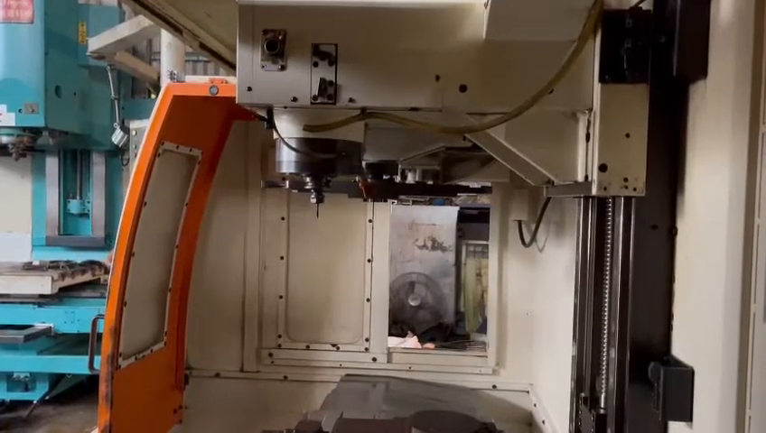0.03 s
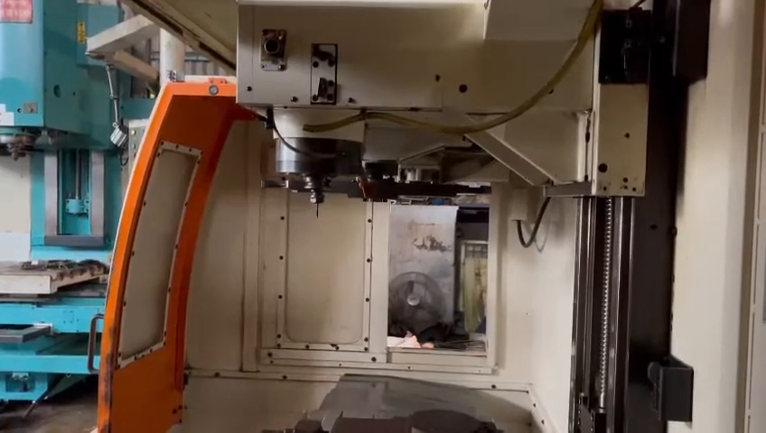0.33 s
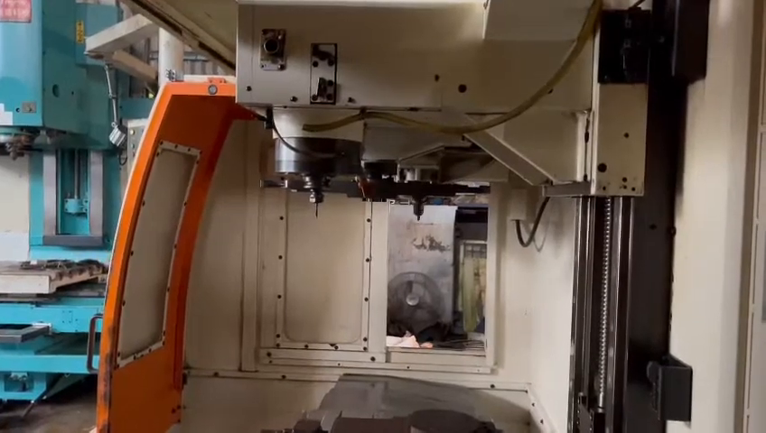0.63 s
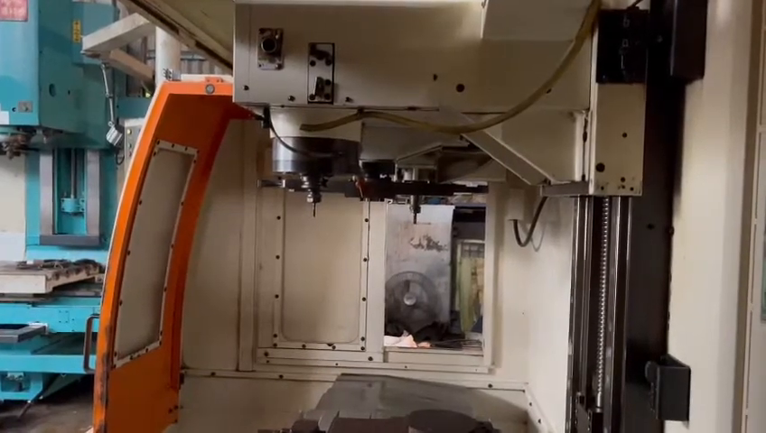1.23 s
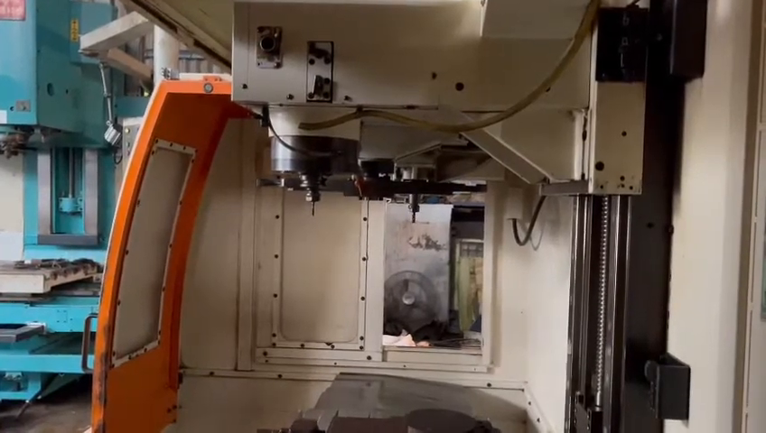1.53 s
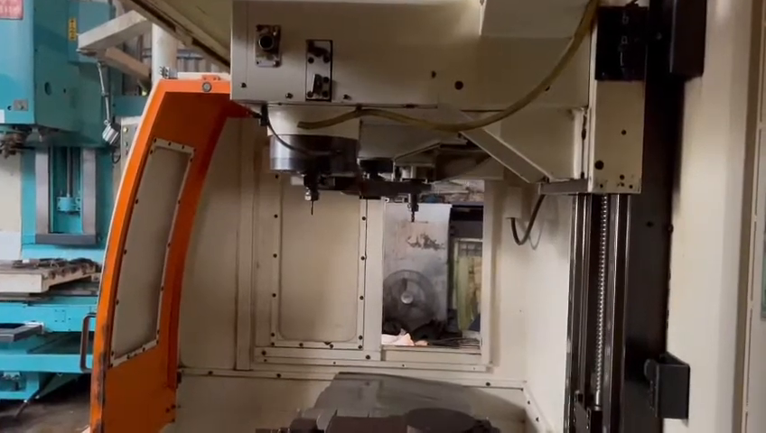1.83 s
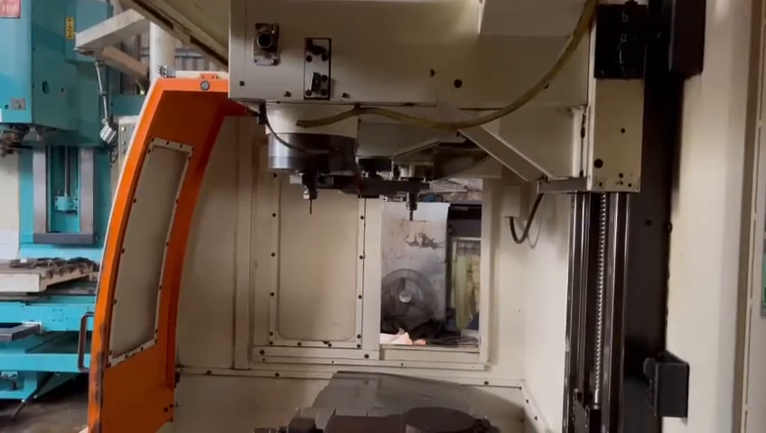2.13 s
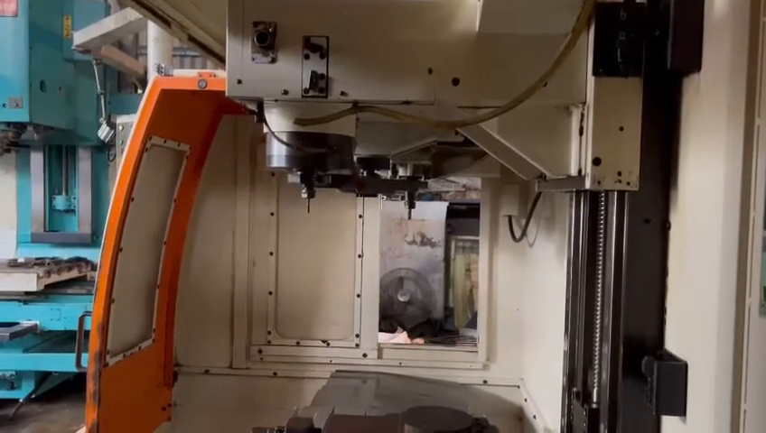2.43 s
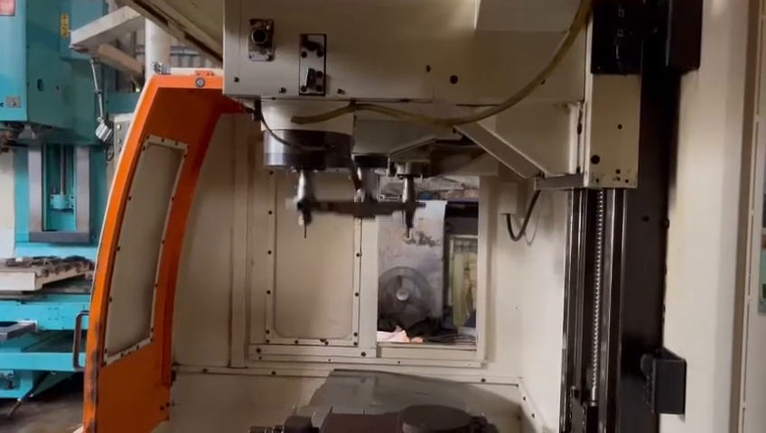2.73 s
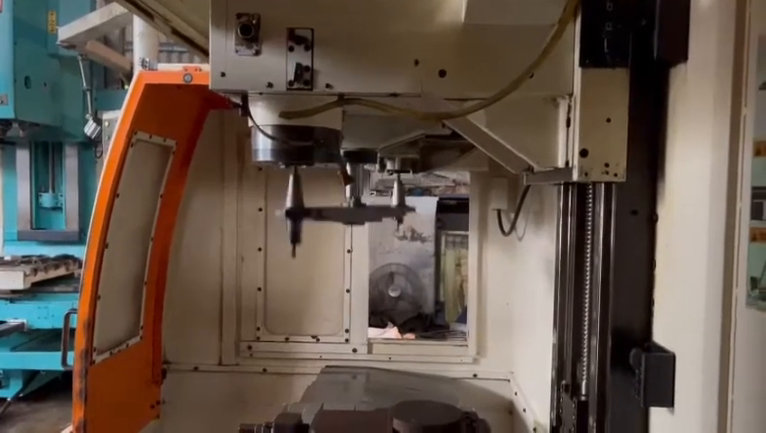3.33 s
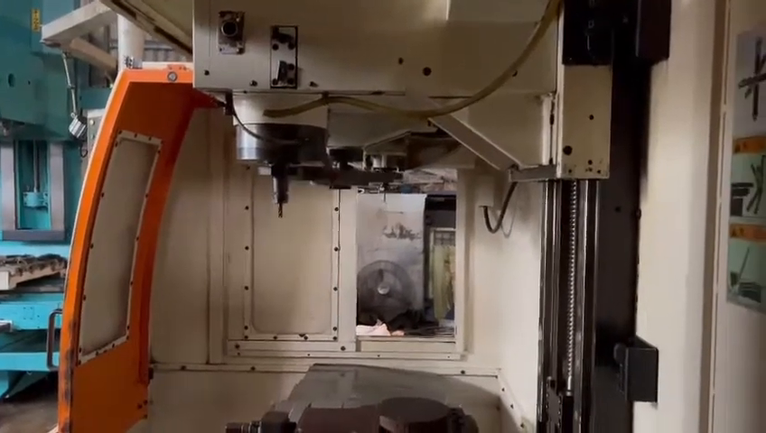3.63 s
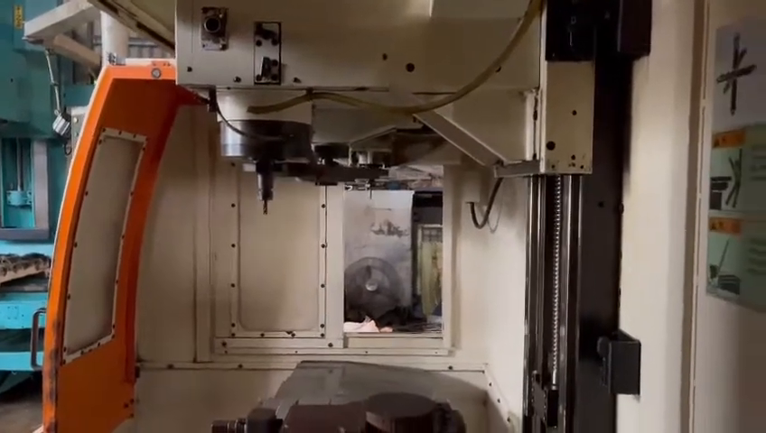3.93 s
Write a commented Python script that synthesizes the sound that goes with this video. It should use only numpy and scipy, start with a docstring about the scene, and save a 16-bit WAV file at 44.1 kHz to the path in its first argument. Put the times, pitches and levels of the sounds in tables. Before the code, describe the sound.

A machining centre changes its tool, heard close up over steady workshop hum. A low rumble fades by 0.4 seconds. A squeak at 1.2 leads to ringing metal knocks at 1.5 and 1.8. A thump and air blast follow at 1.9. From 2.5 a geared arm clanks, whines and chatters over hissing air. It knocks home around 3.5, and a second blast follows, echoing briefly off steel walls.

```python
"""A humming workshop, stereo microphone close by at the open door of a machining centre's steel enclosure.
The machine changes its tool. The head rumbles to a stop; the tool pot squeaks, swings down and lands
with ringing knocks. The drawbar releases with a thump and a blast of air through the spindle bore.
The geared arm whines and chatters as it pulls, swings and seats the tools over a hiss of purge air,
and the drawbar clamps with a second blast. Clatter and air echo between the steel walls."""
import sys
import numpy as np
from scipy import signal
from scipy.fft import rfft, irfft
from scipy.io import wavfile

SR = 44100
rng = np.random.default_rng(int(sys.argv[2]) if len(sys.argv) > 2 else 0)


def store_pcm(level_fs):
    """Save levels as 16-bit WAV."""
    pcm = np.round(np.clip(level_fs, -1, 1) * 32767).astype(np.int16)
    wavfile.write(sys.argv[1], SR, np.atleast_2d(pcm).T)


N = 176400
T = np.arange(N) / SR
HZ = np.maximum(np.arange(N // 2 + 1) * SR / N, 1)

# workshop and idling machine: freq_hz, density_db
SHOP_SPECTRUM = [(22, -70), (35, -72), (50, -57), (70, -62), (90, -59), (115, -62.5), (150, -56.5),
                 (200, -55), (290, -60), (400, -62), (750, -62.5), (950, -69), (1300, -69), (1800, -77),
                 (5700, -78.5), (6700, -70.5), (8400, -76), (9500, -71), (11500, -76)]
# pumps and fans: pitch_hz, level_db, wander_hz
HUM_TONES = [(196.7, -41, 5.89), (222.5, -50.5, 5), (121.3, -46.5, 2.53), (104.1, -49.5, 2.8),
             (72.2, -47, 3.9), (477.7, -49, 3.08), (1228, -45.5, 2.37)]
# head travelling up: freq_hz, density_db
TRAVEL_SPECTRUM = [(25, -74), (60, -43.5), (100, -52.5), (190, -47), (300, -53.5), (600, -75),
                   (1500, -82.5)]
# short notes of the pot, the slowing arm motor and the spindle bore:
# start_s, pitch_hz, level_db, rise_s, decay_s
BRIEF_TONES = [(1.215, 700, -33, 0.045, 0.14), (3.575, 738, -31.5, 0.023, 0.21),
               (3.77, 476, -33, 0.028, 0.082)]
# metal on metal: start_s, struck_part, level_db, rise_s, decay_s, bass_db, treble_db
KNOCKS = [(1.315, "linkage", -15.5, .003, 0.024, 3, -6), (1.469, "linkage", -1.5, .006, 0.026, 3, 8),
          (1.484, "linkage", -1.5, .003, 0.039, 7, -4), (1.549, "linkage", -14, .027, 0.25, 10.5, 1.5),
          (1.8085, "pot", 11, 0.0016, 0.0061, -14, -7.5), (1.8112, "pot", 7.5, .00057, 0.022, -21.5, -6),
          (1.823, "pot", -1, .003, 0.11, 0.5, -16), (2.539, "arm", -3, 0.0043, 0.034, -3, 5.5),
          (2.553, "arm", -2, .003, 0.027, 8, 5), (2.657, "arm", -4.5, .024, 0.036, 1.5, 1.5),
          (2.697, "arm", 2.5, 0.0018, 0.017, -2, 1.5), (2.714, "arm", -3, .002, .024, 5, -8),
          (2.786, "arm", -15, .001, .005, -9, 0), (2.935, "arm", -20, .0022, .02, -4, -20),
          (3.489, "arm", -8, .032, 0.034, 4, 10), (3.551, "arm", 3, .004, 0.014, -3, -1.5),
          (3.566, "arm", -0.5, .002, 0.016, -7, -11), (3.599, "arm", -9.5, .025, 0.038, -2, -14)]
# clatter of a knock: freq_hz, density_db
CLATTER_SPECTRUM = [(60, -68), (250, -58), (500, -53.5), (850, -56.5), (1200, -49.5), (1700, -55.5),
                    (2400, -55.5), (3100, -57), (4000, -58), (5000, -61.5), (7000, -69), (11500, -93)]
# modes of the pot's linkage, the pot and the arm: pitch_hz, spread_hz, level_db, t60_s
LINKAGE_MODES = [(470.6, 7.1, 5.5, .4), (651, 20, 4.5, .45), (833, 18, 6, .3), (1103, 38.6, 6, 0.34),
                 (1578, 70, -0.5, 0.67), (1715, 21, 1, 0.55), (2350, 50, -0.5, .8), (2580, 40, -2, .6),
                 (2832, 22, -1, .25), (3450, 81, 7, 0.18), (3680, 70, 6, 0.48), (3870, 40, -2, 0.27),
                 (4600, 70, -3, .45)]
POT_MODES = [(635, 11, 3.5, 0.57), (1170, 39, 5.5, 0.28), (1267, 19, 12.5, 0.17), (1440, 20, 0, 0.56),
             (1622, 39, 1.5, 0.36), (1840, 27, 5, 0.16), (2050, 60, -2, 0.25), (2320, 30, 3, 0.18),
             (2436, 15, 4, 0.33), (2500, 20, 3, .3), (2885, 17, 2, .27), (3850, 30, 6, .24),
             (4090, 21, 5, .24)]
ARM_MODES = [(644, 13.6, 5.5, 0.39), (1050, 23, 7, 0.18), (1097, 17, 0.5, 0.37), (1300, 40, -4, 0.18),
             (2280, 37, 1, .22), (2400, 36, 6.5, .28), (2650, 20, 2, .35), (2780, 36, 3, 0.23),
             (3200, 30, -3, 0.18), (3354, 30, 1, .16), (4100, 50, 0, .2), (4570, 45, 9, 0.14)]
# what rings when struck: struck_part, modes
PART_MODES = {"linkage": LINKAGE_MODES, "pot": POT_MODES, "arm": ARM_MODES}
# drawbar air: start_s, level_db, rise_s, hold_s, sag_db_per_s, release_db_per_s, treble_db
BLASTS = [(1.932, 2.24, 0.019, 0.4, 12.5, 62, -3.5), (3.604, 1, 0.063, 0.34, 11, 27, -4)]
# air jet: freq_hz, density_db
JET_SPECTRUM = [(200, -101), (700, -65.5), (1300, -56), (2200, -58), (3400, -53), (4600, -52),
                (5600, -54.5), (7000, -54), (8600, -84.5), (10000, -55.5), (11500, -57)]
# spindle bore, open and with the tool seated: freq_hz, width_hz, density_db
BORE_OPEN = [(1515, 29, -57), (2220, 36, -56), (2660, 34, -55.5), (2910, 19, -47), (3040, 23, -57),
             (3510, 47, -50), (4000, 36, -55), (4440, 50, -51), (4500, 24, -45.5), (4760, 93, -50.5),
             (5080, 33, -50), (5520, 36, -50), (5590, 44, -46)]
BORE_SEATED = [(1250, 32, -54), (1530, 70, -55.5), (2140, 19, -48.5), (2317, 26, -49), (2800, 21, -46),
               (3170, 35, -54), (3560, 60, -55), (4150, 75, -66), (4550, 67, -51.5), (5750, 80, -63)]
# drawbar and cam at their stops: start_s, level_db, decay_s
THUMPS = [(1.942, 9.5, 0.029), (2.069, -7, 0.073), (2.39, 0, 0.081), (2.722, 2, .06), (2.935, 4.5, 0.035),
          (3.391, -2.5, 0.083), (3.559, 4, 0.019), (3.612, 2, 0.024), (3.632, 0.5, 0.036)]
# shaken frame: freq_hz, density_db
THUMP_SPECTRUM = [(22, -81), (48, -47.5), (75, -47), (130, -50), (210, -53), (300, -60), (700, -60.5),
                  (2000, -100)]
# flow of purge air: time_s, level_db
PURGE_FLOW = [(2.64, 3), (2.69, 2.5), (3.5, 4.5), (3.57, -23), (3.61, -28)]
# its hiss: freq_hz, density_db
PURGE_SPECTRUM = [(1000, -78.5), (2500, -72.5), (2900, -70), (3400, -66), (3580, -81), (3850, -81),
                  (4050, -74), (4600, -70), (5700, -67), (6800, -74.5), (8400, -72.5), (9500, -84),
                  (11200, -69)]
# load on the arm's drive: time_s, level_db
ARM_LOAD = [(2.66, -25), (2.73, -8), (2.82, -1.5), (2.94, 1), (3.02, 2), (3.1, -2), (3.17, -2), (3.3, -2),
            (3.4, 1.5), (3.47, -3.5), (3.52, -12), (3.66, -23)]
# gearbox resonances: freq_hz, width_hz, density_db
GEARBOX_MODES = [(804, 67, -54.5), (1011, 31, -51), (1838, 28, -51.5), (2020, 40, -55), (2274, 50, -50),
                 (3380, 26, -58.5), (4040, 33, -65), (4720, 28, -57), (5100, 100, -64.5)]
# broad grinding: freq_hz, density_db
GRIND_SPECTRUM = [(100, -68), (450, -97), (800, -65), (1400, -60), (2200, -65), (2550, -90), (3700, -77),
                  (8000, -90)]
# gear mesh and motor: pitch_hz, level_db, wander_hz
WHINE_TONES = [(2187, -34.5, 8.9), (2318, -34.5, 13.9), (2360, -38.5, 8.8), (3392, -44, 14),
               (4770, -47, 11.8)]
# lower tones of the arm swinging round: pitch_hz, level_db, wander_hz
SWING_TONES = [(261.4, -39.5, 4.1), (780, -38, 16), (822, -34.5, 18)]
# likeness of left and right at the microphone: freq_hz, correlation
STEREO_LIKENESS = [(40, .999), (80, .993), (150, .92), (280, .78), (420, .5), (600, .15), (800, .48),
                   (1100, .62), (1500, -.25), (1800, .8), (2400, .68), (2900, .35), (3700, .46),
                   (6500, .26), (7200, -.65), (7700, -1), (9300, -1), (10000, -.05), (10400, .6),
                   (10900, 1)]
# balance at the microphone: freq_hz, left_minus_right_db
STEREO_BALANCE = [(60, 0), (250, .3), (1000, .7), (2200, 2.5), (4500, 2.3), (7500, 0), (11500, 0)]


def amp(db):
    """Decibels to gain."""
    return 10 ** (np.asarray(db) / 20)


def curve(points):
    """Rows of freq_hz, value joined on a log-frequency axis."""
    hz, value = np.array(points, float).T
    return np.interp(np.log(HZ), np.log(hz), value)


def fader(points):
    """Gain that follows rows of time_s, level_db."""
    return amp(np.interp(T, *np.array(points).T, left=-90, right=-90))


def resonant(spectrum, modes):
    """Gain of a broad spectrum with steep-skirted resonances on top."""
    peaks = sum(amp(db) / (1 + 1j * (HZ - hz) / width) ** 2 for hz, width, db in modes)
    return np.hypot(amp(curve(spectrum)), np.abs(peaks))


def shelf(hz, db):
    """Gain that moves by db above hz."""
    return amp(db / (1 + (hz / HZ) ** 4))


def colour(x, gain):
    """Causal filter that gives unit white noise the density gain per root Hz."""
    cepstrum = irfft(np.log(np.abs(gain) + 1e-9), N)
    cepstrum[1:N // 2] *= 2
    cepstrum[N // 2 + 1:] = 0
    impulse = irfft(np.exp(rfft(cepstrum)), N)
    return irfft(rfft(x, 2 * N) * rfft(impulse, 2 * N))[..., :N] * np.sqrt(SR / 2)


def noise():
    """Two unrelated white noises."""
    return rng.standard_normal((2, N))


def walk(rate_hz):
    """Random drift with a spread of 1."""
    knots = rng.standard_normal(N // 10)
    drift = np.interp(T * rate_hz, np.arange(len(knots)), knots)
    return drift / drift.std()


def swell(start, rise, decay):
    """Envelope that builds up and dies away."""
    age = np.maximum(T - start, 0)
    return np.minimum(age / rise, 1) * np.exp(-np.maximum(age - rise, 0) / decay)


def tones(rows, rate_hz, flutter_db, speed=1):
    """Tones that waver in pitch and level."""
    out = 0
    for hz, db, wander in rows:
        phase = 2 * np.pi * np.cumsum(hz * speed + wander * walk(rate_hz)) / SR
        level = np.sqrt(2) * amp(db + flutter_db * walk(rate_hz / 2))
        out += level * np.sin(phase + np.array([[0], [.9]]))
    return out


def workshop():
    """Room tone: broad machine noise under wavering pumps and fans."""
    return colour(noise(), amp(curve(SHOP_SPECTRUM))) + tones(HUM_TONES, 25, flutter_db=3.5)


def head_travel(stop_s=0.15, fade_s=0.09):
    """The head rumbles through the last of its climb."""
    moving = np.minimum(T / 0.023, 1) * np.exp(-np.maximum(T - stop_s, 0) / fade_s)
    return colour(noise() * moving, amp(curve(TRAVEL_SPECTRUM)))


def brief_tones():
    """Short wavering notes: the pot squeaks, the slowing arm motor sings, air sounds the spindle bore."""
    return sum(swell(start, rise, decay) * tones([(hz, db, 4)], 40.08, flutter_db=4.5)
               for start, hz, db, rise, decay in BRIEF_TONES)


def knocks(bass_hz=643, treble_hz=3140, crack_db=10, crack_s=.0005, ring_db=-34.5):
    """Contacts rattle, echo and ring the struck part; the faster the contact, the harder it cracks."""
    clatter, cracks, rings = 0, 0, np.zeros((2, N))
    for start, part, db, rise, decay, bass_db, treble_db in KNOCKS:
        tone = amp(db + bass_db) * shelf(bass_hz, -bass_db) * shelf(treble_hz, treble_db)
        first = int(start * SR)
        rattle = noise() * swell(start, rise, decay) * amp(1.34 * walk(350))
        crack = (np.arange(N) == first) * amp(crack_db) * min(crack_s / rise, 1)
        hit = colour(np.vstack([rattle, crack]), amp(curve(CLATTER_SPECTRUM)) * tone)
        clatter += hit[:2]
        cracks += hit[2]
        age = T[:min(N - first, SR // 2)]
        feed = amp(ring_db) * np.sqrt(decay / 0.021)  # longer rattles feed the modes more
        rings[:, first:first + len(age)] += feed * steel_ring(PART_MODES[part], rise, tone, age)
    return enclosure(clatter) + cracks + rings


def steel_ring(modes, rise, tone, age):
    """A struck part rings: every mode is a close, beating trio."""
    out = 0
    for hz, spread, db, t60 in modes:
        trio = hz + spread * (np.array([-1, 0, 1]) + rng.uniform(-0.51, 0.53, 3))
        cycles = trio[:, None] * age + rng.random((2, 3, 1))
        waves = np.sin(2 * np.pi * cycles).sum(axis=1) / np.sqrt(3)
        level = amp(db) * np.interp(hz, HZ, tone)
        out += level * np.exp(-np.log(1000) * age / t60) * waves
    return np.minimum(age / rise, 1) * out


def enclosure(x, t60_s=0.29, echo_db=-0.5):
    """Dense short echoes off the steel walls join the direct sound."""
    impulse = (noise() * swell(0.0013, 0.0094, t60_s / np.log(1000)))[:, :SR // 2]
    impulse /= np.sqrt(np.sum(impulse ** 2, axis=1, keepdims=True))
    echoes = signal.fftconvolve(x, impulse, axes=1)[:, :N]
    return (x + amp(echo_db) * echoes) / np.hypot(1, amp(echo_db))


def air_blasts(treble_hz=3670):
    """A valve opens and air sounds the spindle bore; pressure sags, then runs out."""
    out = 0
    for (start, db, rise, hold, sag, release, treble_db), bore in zip(BLASTS, (BORE_OPEN, BORE_SEATED)):
        age = np.maximum(T - start, 0)
        drop_db = sag * np.minimum(age, hold) + release * np.maximum(age - hold, 0)
        flow = np.minimum(age / rise, 1) * amp(db - drop_db + 0.33 * walk(50))
        out += colour(noise() * flow, resonant(JET_SPECTRUM, bore) * shelf(treble_hz, treble_db))
    return out


def thumps(rise_s=0.0031):
    """Heavy parts reach their stops and shake the frame."""
    push = sum(amp(db) * swell(start, rise_s, decay) for start, db, decay in THUMPS)
    return colour(noise() * push, amp(curve(THUMP_SPECTRUM)))


def purge_air():
    """Between the blasts, air blows the open spindle clean."""
    return colour(noise() * fader(PURGE_FLOW), amp(curve(PURGE_SPECTRUM)))


def arm_chatter(rate_hz=119, jitter=0.25, decay_s=0.0081, spread_db=0.7):
    """Teeth and cam rollers chatter unevenly into the gearbox, louder under load."""
    gaps, sizes = rng.standard_normal((800, 2)).T
    times = np.cumsum(np.exp(jitter * gaps)) / rate_hz
    latest = np.maximum(np.searchsorted(times, T) - 1, 0)
    chatter = amp(spread_db * sizes[latest]) * np.exp(-np.abs(T - times[latest]) / decay_s)
    drive = fader(ARM_LOAD) * chatter / np.sqrt(np.mean(chatter ** 2))
    return colour(noise() * drive, resonant(GRIND_SPECTRUM, GEARBOX_MODES))


def arm_whine(swing_start_s=2.79, swing_end_s=3.49, ramp_s=.12, brake_s=3.45, slowing_per_s=.5):
    """Gears and motor whine, falling as the arm parks; lower tones join while it swings."""
    speed = np.clip(1 - slowing_per_s * (T - brake_s), 0, 1)
    whine = tones(WHINE_TONES, 150, flutter_db=2.0, speed=speed)
    swinging = np.clip(np.minimum(T - swing_start_s, swing_end_s - T) / ramp_s, 0, 1)
    return fader(ARM_LOAD) * (whine + swinging * tones(SWING_TONES, 70, flutter_db=2.5))


def scene():
    """Everything at the microphone, a little to the left, its width varying with frequency."""
    machine = workshop() + head_travel() + thumps() + brief_tones() + knocks()
    machine = machine + arm_chatter() + arm_whine()
    a, b = rfft(machine + enclosure(purge_air() + air_blasts()))
    alike = np.clip(curve(STEREO_LIKENESS), -.9995, .9995)
    mid = (a + b) * np.sqrt(1 + alike) / 2
    side = (a - b) * np.sqrt(1 - alike) / 2
    lean = amp(curve(STEREO_BALANCE) / 2)
    return irfft(np.array([(mid + side) * lean, (mid - side) / lean]), N)


def record(dry):
    """The recorder rounds the highest peak and cuts the top steeply."""
    ceiling, top_hz = .9, 11700
    rounded = dry / (1 + (dry / ceiling) ** 8) ** (1 / 8)
    return signal.sosfilt(signal.ellip(12, .2, 90, top_hz, fs=SR, output="sos"), rounded)


dry = scene()
out = record(dry)
store_pcm(out)
```